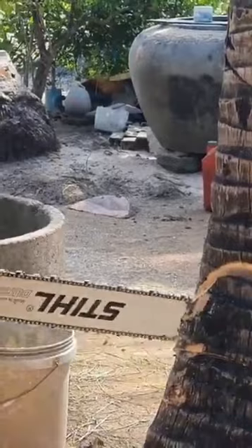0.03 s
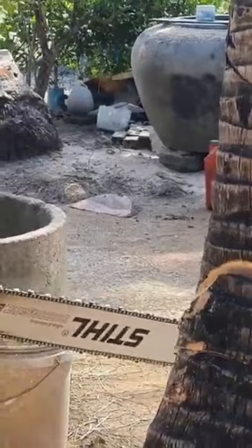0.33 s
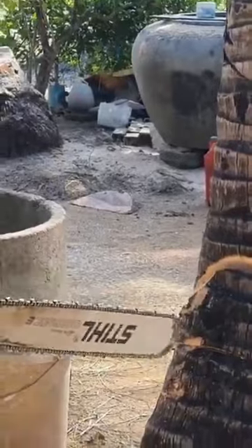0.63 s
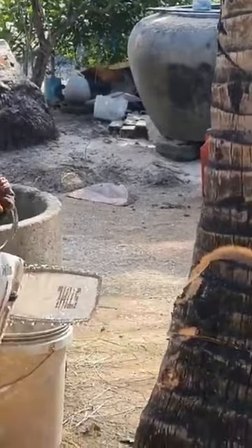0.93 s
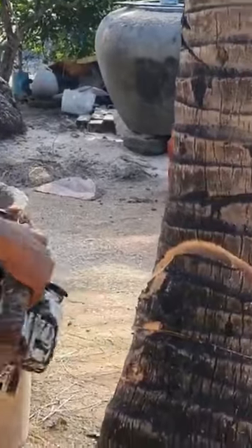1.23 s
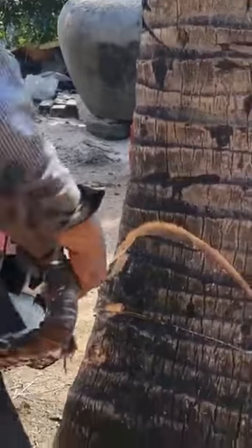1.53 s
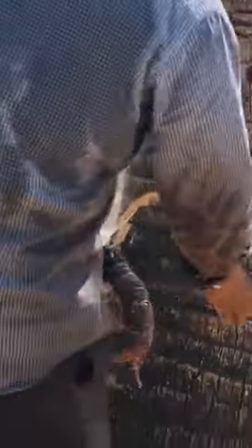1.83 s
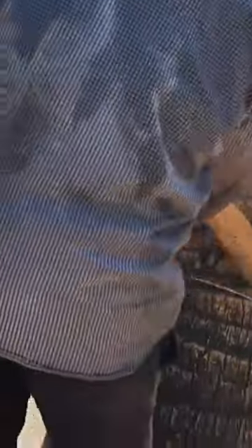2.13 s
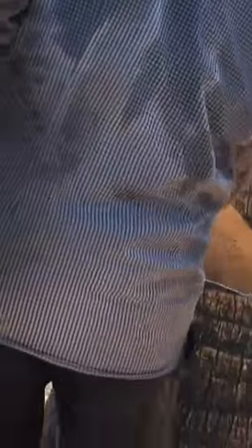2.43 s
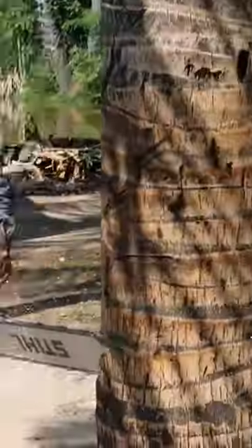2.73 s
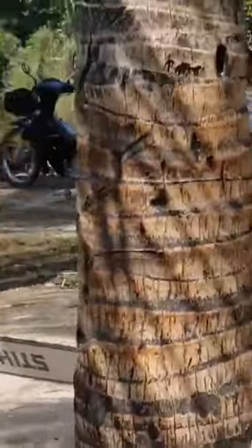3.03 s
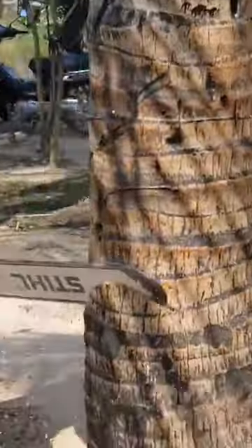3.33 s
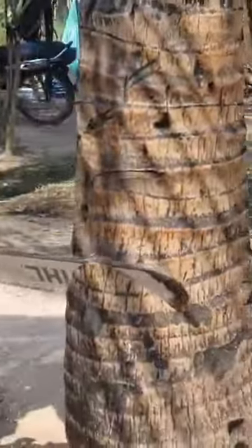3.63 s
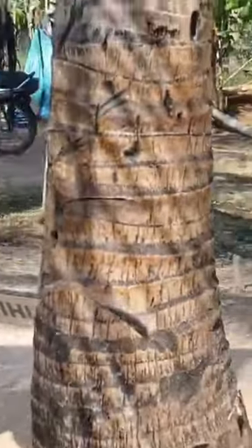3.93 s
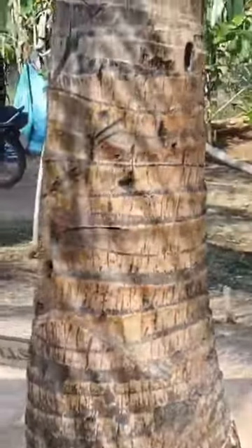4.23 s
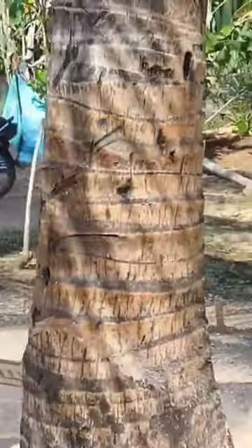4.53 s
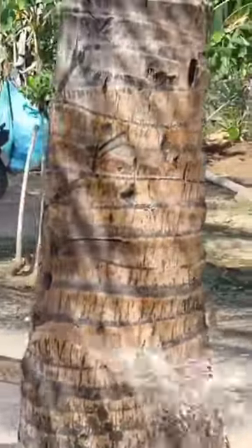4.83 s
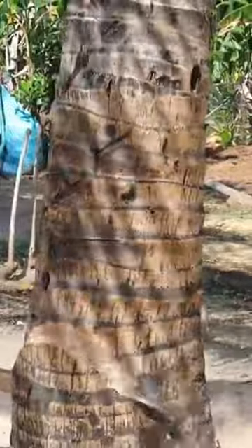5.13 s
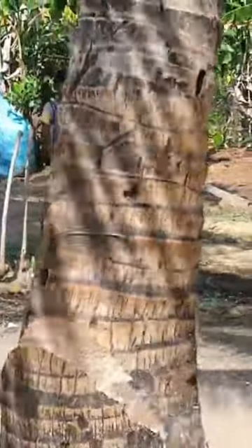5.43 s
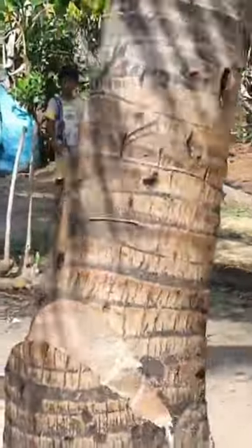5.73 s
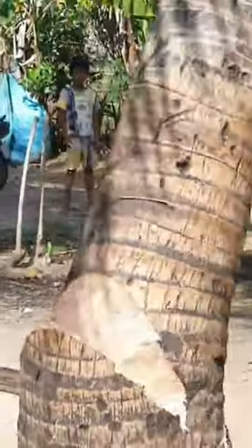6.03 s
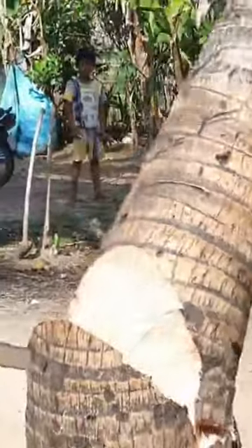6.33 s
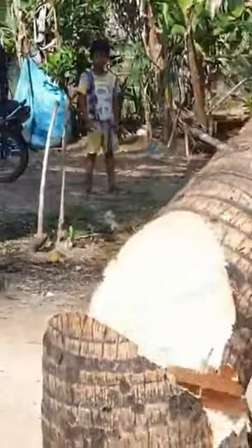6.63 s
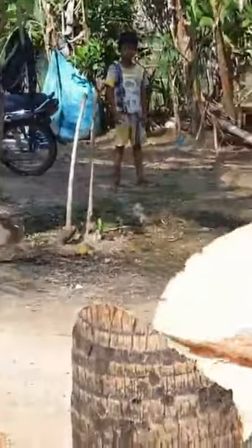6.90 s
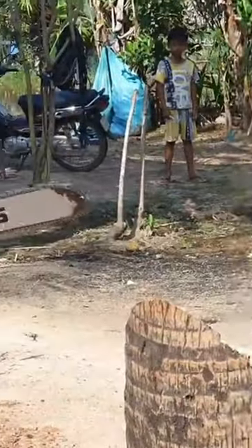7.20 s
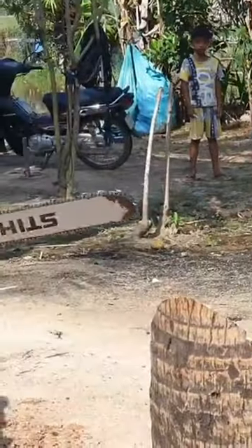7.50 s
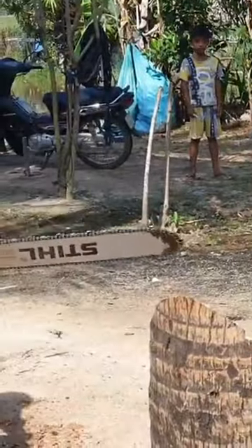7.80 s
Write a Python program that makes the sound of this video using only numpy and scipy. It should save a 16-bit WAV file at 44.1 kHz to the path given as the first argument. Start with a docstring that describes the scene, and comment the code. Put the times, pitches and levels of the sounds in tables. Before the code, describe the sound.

A two-stroke chainsaw idles unevenly in an open yard, close by and louder on the right. For the first three seconds it putters and stumbles, with sharp, hollow pops from the muffler and a rattling loose chain. At about 3.1 seconds the sound jumps abruptly to the saw at full throttle in a palm trunk: a loud, steady snarl with metallic ringing and the bright, gritty tearing of fibres. The pitch sags around 5 seconds as the engine bogs. At 5.5 seconds the throttle is released, then the saw revs once more from about 5.7 to 6 seconds and runs down to a popping idle. At about 7.1 seconds the palm's crown hits the ground with a crunch, followed at once by a short swish of leaves. The saw keeps idling until the end at about 8 seconds, with a weak outdoor echo.

```python
"""A two-stroke chainsaw idles unevenly in an open yard, close by and louder on the right: the ports
putter, single firings bark and pop in the muffler, the loose chain rattles. At 3.1 s the sound cuts
abruptly to the saw already at full throttle in a palm trunk: every turn fires, snarling and ringing
the bar, while the teeth tear fibres. It bogs, is released at 5.5 s, revs once more and runs down to
idle. At 7.1 s the palm's crown crunches to the ground and its leaf tips swish after it."""
import sys
import numpy as np
from scipy import signal
from scipy.fft import rfft, irfft
from scipy.io import wavfile
from scipy.ndimage import uniform_filter1d, map_coordinates

SR = 44100
rng = np.random.default_rng(int(sys.argv[2]) if len(sys.argv) > 2 else 0)


def to_wav(s):
    """Save 16-bit WAV."""
    ch = np.atleast_2d(s).T  # columns
    pcm = np.round(np.clip(ch, -1, 1) * 32767)  # PCM
    wavfile.write(sys.argv[1], SR, pcm.astype(np.int16))


N = 355446
T = np.arange(N) / SR

# outdoor rumble bed: (frequency [Hz], level [dB])
YARD_EQ = [(20, 1), (70, 4), (200, 6), (600, 10), (3000, -35), (16000, -40)]
# even runs of idle firings, with stumbles between: (first [s], last [s], firings [count], level [dB])
IDLE_RUNS = [(.088, .272, 4, -10), (.328, .503, 4, -8.5), (.625, .746, 3, -7.5), (.862, 1.104, 5, -8.5),
             (1.193, 1.25, 2, -12), (1.317, 1.721, 8, -8), (1.806, 1.865, 2, -9.5), (1.951, 1.951, 1, -8),
             (2.007, 2.231, 5, -2.5), (2.287, 2.287, 1, -9), (2.316, 2.542, 5, -5), (2.598, 2.598, 1, -2),
             (2.655, 2.8245, 4, -5), (2.881, 2.9395, 3, -7.5), (2.998, 3.1155, 3, -4.5),
             (6.703, 6.744, 2, -11), (6.829, 6.874, 2, -11), (6.994, 7.045, 2, -11), (7.2, 7.279, 2, -9.5),
             (7.333, 7.386, 2, -14), (7.438, 7.4905, 2, -9.5), (7.569, 7.888, 7, -10),
             (7.943, 7.999, 2, -16)]
# full-throttle stretches, the first starting at a hard cut, the second at a trigger pull:
# (start [s], release [s], closing time [s])
FULL_THROTTLE = [(3.143, 5.511, 0.095), (5.681, 6.021, 0.301)]
# crank speed from the hard cut to the top of the last rev: (time [s], speed [turns/s])
REV_CURVE = [(3.16, 115.5), (3.22, 117.3), (3.27, 116.7), (3.33, 114.7), (3.42, 120.7), (3.47, 123.1),
             (3.57, 119.9), (3.66, 118.8), (3.78, 121.7), (4.29, 117.2), (4.55, 111.6), (4.78, 115.3),
             (4.86, 114.0), (4.96, 97.9), (5.15, 106.6), (5.24, 107.5), (5.5, 103.7), (5.53, 99.6),
             (5.59, 89.0), (5.68, 72.4), (5.72, 72.1), (6.0, 100.2), (6.09, 104.4)]
# how hard the teeth bite: (time [s], bite [0-1])
BITE = [(3.14, 0), (3.15, 1), (5.45, 1), (5.56, 0)]
# how squarely the muffler faces the listener: (time [s], level [dB])
FACING = [(0, 3), (1.3, 3.5), (2.03, 5), (2.35, 4), (3.0, 3), (3.3, 1.5), (3.75, 5), (4.1, 5), (4.5, 0.5),
          (5.0, -2), (5.4, -1), (5.7, -3.5), (6.05, -0.5), (6.4, -2), (6.85, -4), (7.35, 4), (8.05, -1)]
# swells as the saw is swung: (peak [s], half-width [s], throb [dB], honk [dB], upper note [dB])
SWING_SWELLS = [(.98, 0.052, -57.5, -34.5, -39), (1.65, 1, -43.5, -41, -63), (2.02, 0.047, -49, -46, -41),
                (2.16, 0.059, -53, -29.5, -40.5), (7.3, 0.14, -47, -39, -29), (7.8, 0.28, -62, -73, -39.5)]
# low exhaust throb: (frequency [Hz], level [dB])
THROB_EQ = [(30, -42), (70, -8), (105, -2), (160, -1), (200, -5.5), (245, -0.5), (290, -1), (380, 6),
            (900, -62)]
# hollow honk of the ports: (frequency [Hz], width [Hz], level [dB])
HONK_MODES = [(374, 165, 19), (462, 810, -12), (647, 40, 14.5)]
# the muffler's broad putter while the chain runs free: (frequency [Hz], level [dB])
MUFFLER_FREE_EQ = [(250, -43), (450, -12.5), (570, 3), (700, 7.5), (850, -1), (1000, -6), (1200, -8),
                   (1400, -12), (2200, -18)]
# the muffler's peakier note in the trunk: (frequency [Hz], level [dB])
MUFFLER_LOADED_EQ = [(250, -50), (480, -2.5), (590, 10), (660, 3.5), (730, 11.5), (790, 9.5), (870, -5),
                     (970, -18), (1090, -0.5), (1250, -43), (2200, -15.5)]
# upper hollow note heard on the swings: (frequency [Hz], width [Hz], level [dB])
UPPER_NOTE_MODE = [(653.4, 57, 0)]
# bark as the saw is turned: (time [s], rise [s], decay [s], gas [dB], clank [dB], fizz [dB])
BARK_SHAPE = [(0, 0.0047, 0.0083, -7.5, -15, -4), (1.85, 0.0024, 0.0083, -9, -7, 0.5),
              (2.1, 0.0024, 0.0018, -7, -12, -1), (2.6, 0.0028, 0.0014, -6.5, -26, 3),
              (3.1, 0.0023, 0.0018, -8.5, -36, 4.5), (6.7, 0.00055, 0.00068, -8.5, -14, 6),
              (7.5, 0.00042, 0.0009, -8.5, -3, 2), (8, 0.00079, 0.0013, -8.5, -8, 2)]
# muffler shell clank on a single firing: (frequency [Hz], level [dB])
CLANK_MODES = [(2310, -1.5), (2560, -6), (4980, -11)]
# the bark's spit of gas: (frequency [Hz], level [dB])
BARK_EQ = [(500, -38.5), (950, 13.5), (1250, -10), (1550, -8), (2050, -1), (2500, 6), (3100, -2.5),
           (3700, 2), (4700, 1), (5750, 5), (6300, -4), (6900, 3), (7600, -6.5), (8600, -18), (12500, -4),
           (15000, -13.5), (16000, -21.5)]
# muffler cavity: (frequency [Hz], width [Hz], level [dB])
CAVITY_MODES = [(782, 450, 0), (1030, 260, -0.5)]
# rattle of loose chain and clutch: (time [s], level [dB])
RATTLE_LEVEL = [(0, -25.5), (1.5, -24.5), (2.1, -24.5), (2.5, -26.5), (3.1, -28.5), (6.0, -24.5),
                (6.6, -29.5), (7.45, -27.5), (8.05, -30)]
# clattering links: (frequency [Hz], level [dB])
RATTLE_EQ = [(40, -60), (400, 10.5), (700, 9.5), (950, -1), (1400, -6.5), (2000, -0.5), (2450, 2),
             (3100, 1.5), (4300, -4), (5800, -5.5), (7000, -7), (8600, -24), (12000, -13.5), (15000, -14),
             (16000, -19)]
# hiss of the running chain and the gas jet: (frequency [Hz], level [dB])
RASP_EQ = [(30, -10), (350, 5), (500, -29), (1000, -13.5), (1600, -19), (2300, 3.5), (3100, 2),
           (3800, -3.5), (4450, -2), (5000, 0.5), (5700, -6.5), (6400, -3.5), (7200, -10), (8600, -18.5),
           (12500, -8), (15000, -8), (16000, -43.5)]
# muffler shell under throttle: (frequency [Hz], width [Hz], level [dB])
SHELL_MODES = [(1860, 170, -2), (2337, 85, 4), (2520, 150, -2), (2630, 180, 2.5), (3012, 120, 4.5)]
# bar resonances singing out: (peak [s], half-width [s], frequency [Hz], width [Hz], level [dB])
BAR_RINGS = [(3.35, 0.16, 1057, 109, -31), (3.35, 0.11, 1810, 303, -28), (3.4, 0.25, 3080, 256, -29),
             (3.55, 0.45, 6150, 330, -27), (3.8, 0.11, 1094, 110, -29), (3.9, 0.26, 2290, 70, -22),
             (4.1, 0.36, 6220, 172, -29), (4.68, 0.18, 3064, 170, -21.5), (4.7, 0.33, 2620, 129, -26),
             (4.55, 0.96, 1480, 220, -41), (4.7, 0.25, 6360, 150, -31), (4.95, 0.12, 1990, 198, -22.5),
             (5.1, 1, 4910, 199, -28), (5.28, 0.2, 2426, 218, -22), (5.97, 0.16, 2546, 302, -20.5),
             (6.02, 0.16, 3040, 300, -24.5)]
# full-throttle snarl: (frequency [Hz], level [dB])
SNARL_EQ = [(100, -50), (400, -20), (950, -12), (1150, -14), (1400, -6), (1650, -6), (1900, -2.5),
            (2270, 0.5), (2550, 3), (2800, 2), (3060, 2), (3350, -3), (3700, -8), (4400, -9), (5000, -3),
            (5800, -6), (6400, -2), (7500, -12), (9000, -20), (16000, -24)]
# sharp edge of each firing: (frequency [Hz], level [dB])
CRACK_EQ = [(500, -50), (3500, -14), (5000, 7), (5800, 0), (6600, 16), (7600, -9), (8800, -10), (11500, 9),
            (13000, 4), (15500, -20)]
# tearing fibres: (frequency [Hz], level [dB])
TEAR_EQ = [(200, -19), (1200, -17), (2500, -11), (3600, -7.5), (4400, -13), (5400, 23), (7000, 2),
           (8800, -42), (12000, 18.5), (15500, -10)]
# fronds hitting the dirt: (frequency [Hz], level [dB])
FROND_EQ = [(60, -41), (300, -5.5), (800, -14), (1200, -13), (2200, -7.5), (3200, -2), (4200, 0),
            (6000, 5.5), (8500, -4.5), (15000, -10)]
# shading of the saw's left channel: (frequency [Hz], level [dB])
LEFT_SHADE_EQ = [(60, -10.5), (700, -10.8), (1300, -9.5), (2400, -6.5), (4400, -4), (8000, -5),
                 (14000, -2.5)]
# how alike the two channels are: (frequency [Hz], likeness [0-1])
STEREO_LIKENESS = [(60, .97), (600, .96), (1200, .74), (3000, .6), (8000, .5), (15000, .5)]
# treble drift as the saw moves: (time [s], left level [dB])
TREBLE_PAN = [(0, -2.5), (1.9, -1.5), (2.15, 0.5), (2.8, 2.5), (3.2, 0.5), (5.9, -1), (6.9, -1), (8, -2.5)]

IDLE_HZ, SETTLED_HZ, FULL_HZ = 35.5, 62, 120  # crank speeds: idle, end of stumbling, flat out
OPEN_S, JITTER_S = .008, .00001  # throttle attack; timing scatter of the firings
ROUGHNESS = .12  # share of noise driving the bar and shell


def amp(db):
    """Decibels to gain."""
    return 10 ** (np.asarray(db) / 20)


def along(rows, column=1):
    """One column of a table as an automation curve."""
    rows = np.array(sorted(map(tuple, rows)))
    return np.interp(T, rows[:, 0], rows[:, column])


def spectrum(points, hz):
    """Joins points on a log-frequency axis."""
    knots_hz, values = np.transpose(points)
    return np.interp(np.log(hz + 1), np.log(knots_hz + 1), values)


def steady(x, size=4800):
    """Rides the slow level to rms 1, leaving transients their shape."""
    power = uniform_filter1d(uniform_filter1d(x ** 2, size), size)
    return x / np.sqrt(abs(power) + 1e-4 * np.mean(x ** 2))


def eq(x, points, size=4096):
    """Minimum-phase equaliser."""
    curve_db = spectrum(points, abs(np.fft.fftfreq(size, 1 / SR)))
    log_gain = np.log(amp(np.maximum(curve_db, -100)))
    taps = np.fft.ifft(np.exp(np.conj(signal.hilbert(log_gain)))).real
    return signal.oaconvolve(x, taps[:size // 2])[:N]


def highpass(x, hz, order=4):
    """Rolls off the lows."""
    return signal.sosfilt(signal.butter(order, hz, "high", fs=SR, output="sos"), x)


def ring(x, modes):
    """Parallel resonators, each applied twice for steep skirts."""
    out = np.zeros(N)
    for hz, width, db in modes:
        b, a = signal.iirpeak(hz, hz / (0.65 * width), SR)
        out += amp(db) * signal.lfilter(b, a, signal.lfilter(b, a, x))
    return out


def clicks(times, sizes, half_taps=8):
    """Band-limited clicks at exact moments."""
    at = times[:, None] * SR
    index = np.round(at).astype(int) + np.arange(-half_taps, half_taps + 1)
    shape = np.sinc(index - at) * np.sinc((index - at) / (half_taps + 1))
    return np.bincount(np.clip(index, 0, N - 1).ravel(), (sizes[:, None] * shape).ravel(), N)


def fade(x, decay_s):
    """Turns every click into a falling envelope."""
    return signal.lfilter([1], [1, -np.exp(-1 / SR / decay_s)], x)


def grit(per_s, spread_db, length_s):
    """Random tiny impacts, each a puff of noise, a few of them large."""
    sizes = amp(spread_db * np.minimum(rng.exponential(1, N), 4)) * (rng.random(N) < per_s / SR)
    return steady(np.sqrt(fade(sizes ** 2, length_s)) * rng.standard_normal(N))


def noise_tail(decay_s, size):
    """A dying burst of noise to convolve with."""
    return rng.standard_normal(size) * np.exp(-np.arange(size) / SR / decay_s)


def smear(x, decay_s, size=2048):
    """Spreads clicks over a few milliseconds without changing their tone."""
    spread = rfft(noise_tail(decay_s, size))
    taps = np.roll(irfft(spread / abs(spread)), size // 2)
    return signal.oaconvolve(x, taps, "same")


def bell(peak_s, half_s):
    """A smooth swell in and out."""
    return np.exp(-((T - peak_s) / half_s) ** 2)


def yard_air(level_db=-60):
    """A faint bed of outdoor rumble."""
    rumble = np.array([steady(eq(rng.standard_normal(N), YARD_EQ)) for _ in range(2)])
    return amp(level_db) * rumble * amp([[-6], [0]])


def single_firings(onset_db=-5.0, spread_db=.7):
    """Times and levels of the idle firings, plus one at the start of each full-throttle stretch."""
    idle = [(s, db) for first, last, count, db in IDLE_RUNS
            for s in np.linspace(first, last, round(count))]
    onsets = [(start + OPEN_S / 2, onset_db) for start, _, _ in FULL_THROTTLE]
    times, levels = np.array(sorted(idle + onsets)).T
    return times, levels + spread_db * rng.standard_normal(len(times))


def throttle_opening():
    """Each full-throttle stretch comes in at once, holds and slides shut on release."""
    return sum(np.clip((T - start) / OPEN_S, 0, 1) * np.clip(1 - (T - release) / close_s, 0, 1)
               for start, release, close_s in FULL_THROTTLE)


def crank_speed(coast_s=.39):
    """Idle, a hard cut to working speed, one more rev, then a free run-down to idle."""
    coast = np.exp(-np.maximum(T - REV_CURVE[-1][0], 0) / coast_s)
    return IDLE_HZ + (T >= FULL_THROTTLE[0][0]) * (along(REV_CURVE) - IDLE_HZ) * coast


def crank_angle(speed, fired_s):
    """The angle in turns, nudged so each single firing lands on a whole turn, and those turns."""
    turns = np.cumsum(speed) / SR
    at = np.interp(fired_s, T, turns)
    fired_turns = np.round(at[0]) + np.append(0, np.cumsum(np.round(np.diff(at))))
    return turns + np.interp(T, fired_s, fired_turns - at), fired_turns


def port_putter(turns, strokes, fired_turns, speed, throttle, bite, misfire_db=-4, intake_db=-6,
                intake_turn=0.324, uneven_db=-1.0, stumble_db=3.0, breath_db=-11, settled_db=-18.0):
    """Each turn puffs from the exhaust, then the intake; single firings puff harder."""
    def gain(idle_db, throttle_db, octave_db):
        """A voice grows with throttle and speed, and as it faces the listener."""
        revs_db = octave_db * np.log2(speed / IDLE_HZ)
        return amp(idle_db + throttle_db * throttle + revs_db + along(FACING))

    exhaust_s, intake_s = np.interp(strokes, turns, T), np.interp(strokes + intake_turn, turns, T)
    chance = rng.standard_normal((len(strokes), 2))
    settled = np.clip((speed - IDLE_HZ) / (SETTLED_HZ - IDLE_HZ), 0, 1)
    scatter_db = uneven_db + stumble_db * (1 - np.interp(exhaust_s, T, settled))
    stroke_db = np.where(np.isin(strokes, fired_turns), 0, misfire_db)
    exhaust = clicks(exhaust_s, amp(stroke_db + scatter_db * chance[:, 0]))
    intake = clicks(intake_s, amp(misfire_db + intake_db + 2 * uneven_db * chance[:, 1]))
    puffs = steady(exhaust + intake)
    breath = steady(fade(exhaust, decay_s=0.048) * rng.standard_normal(N))
    turbulence = amp(breath_db + settled_db * settled) * breath
    sputter = .6 * (1 - settled) * rng.standard_normal(N)  # ragged gas flow at idle
    exhaust_flow, flow = steady(exhaust) + turbulence, puffs + turbulence
    throb = steady(eq(exhaust_flow + sputter, THROB_EQ))
    honk = steady(ring(exhaust_flow + 0.13 * puffs, HONK_MODES))
    muffler = steady(bite * eq(flow, MUFFLER_LOADED_EQ) + (1 - bite) * eq(flow, MUFFLER_FREE_EQ))
    upper_note = steady(ring(flow, UPPER_NOTE_MODE))
    throb_swell, honk_swell, upper_swell = sum(amp(levels_db)[:, None] * bell(s, half_s)
                                               for s, half_s, *levels_db in SWING_SWELLS)
    return (np.hypot(gain(idle_db=-47.5, throttle_db=9, octave_db=0.66), throb_swell) * throb
            + np.hypot(gain(idle_db=-47, throttle_db=8, octave_db=1.9), honk_swell) * honk
            + gain(idle_db=-36.5, throttle_db=0.79, octave_db=4.5) * muffler
            + upper_swell * upper_note)


def barks(fired_s, fired_db, open_s=0.0011, hold_s=0.0041, tail_db=-20, tail_s=0.029,
          clank_s=0.0024, detune=0.03, fizz_hz=9000):
    """A single firing spits a short burst of gas and clanks the muffler shell."""
    envelope, clanks = np.zeros(N), np.zeros(N)
    rise_s, decay_s, gas_db, clank_db, fizz_db = (along(BARK_SHAPE, k) for k in range(1, 6))
    for s, db in zip(fired_s, fired_db):
        near = slice(max(int((s - .03) * SR), 0), int((s + .1) * SR))
        age = T[near] - s
        attack = amp(db) * np.exp(np.minimum(age - open_s, 0) / rise_s[int(s * SR)])
        late = np.maximum(age - hold_s, 0)
        release = np.exp(-late / decay_s[int(s * SR)]) + amp(tail_db) * np.exp(-late / tail_s)
        envelope[near] += attack * release
        for hz, mode_db in CLANK_MODES:
            cycles = hz * (1 + detune * rng.standard_normal()) * age + rng.random()
            clanks[near] += amp(mode_db) * attack * np.exp(-late / clank_s) * np.sin(2 * np.pi * cycles)
    spit = rng.standard_normal(N) + 1.5 * grit(per_s=2700, spread_db=2.15, length_s=0.00025)
    gas = highpass(eq(spit, BARK_EQ), 1500)
    fizz = irfft(rfft(gas) * (np.fft.rfftfreq(N, 1 / SR) > fizz_hz), N)
    fizzy_gas = (gas + (amp(fizz_db) - 1) * fizz) / gas.std()
    return amp(gas_db) * envelope * fizzy_gas + amp(clank_db) * clanks


def muffler_pops(fired_s, fired_db, peak_db=-16.0, follow=0.86, lag_s=0.0009):
    """Every single firing knocks the muffler's cavity with the same hollow pop."""
    knocks = ring(clicks(fired_s + lag_s, amp(follow * fired_db)), CAVITY_MODES)
    return amp(peak_db) * knocks / abs(knocks).max()


def chain(fired_s, turns, speed, bite, running_db=-24, octave_db=13, cutting_db=5.0,
          surge=0.049, surge_turn=0.037, jerk=0.052):
    """Loose links clatter, jerked by single firings; the hiss grows with speed and bite."""
    jerks = 1 + jerk * fade(clicks(fired_s + 0.0023, np.ones(len(fired_s))), decay_s=0.01)
    links = (rng.standard_normal(N) + 1.11 * grit(per_s=1800, spread_db=3.3, length_s=0.000072)) * jerks
    links = highpass(links, 1150, order=2) + .1 * links
    rattle = amp(along(RATTLE_LEVEL)) * steady(eq(links, RATTLE_EQ))
    tug = 1 + surge * np.cos(2 * np.pi * (turns - surge_turn))  # each power stroke pulls the teeth
    running = amp(running_db + octave_db * np.log2(speed / FULL_HZ) + cutting_db * bite)
    return rattle + running * tug * steady(eq(links, RASP_EQ))


def firing_blows(stroke_s, uneven_db):
    """One click a turn, very slightly off the beat."""
    chance = rng.standard_normal((len(stroke_s), 2))
    return clicks(stroke_s + JITTER_S * chance[:, 0], amp(uneven_db * chance[:, 1]))


def exhaust_rasp(stroke_s, speed, throttle, bite, gas_db=-20, gas_octave_db=8, buried_db=-3,
                 shell_db=-24, shell_octave_db=18, muffled_db=-1):
    """Under throttle every turn fires: a jet of gas, and a blow that rings the muffler shell."""
    blows = firing_blows(stroke_s, uneven_db=0)
    jet = steady(fade(fade(blows, 0.0009), 0.014)) * rng.standard_normal(N)
    gas = highpass(steady(eq(jet + 0.19 * steady(blows), RASP_EQ)), 950)
    shell = steady(ring(steady(blows) + ROUGHNESS * jet, SHELL_MODES))
    octaves = np.log2(speed / FULL_HZ)
    return throttle * (amp(gas_db + gas_octave_db * octaves + buried_db * bite) * gas
                       + amp(shell_db + shell_octave_db * octaves + muffled_db * bite) * shell)


def bar_ring(stroke_s, throttle, uneven_db=4.5):
    """Firings shake the bar; its resonances come and go as the trunk grips it in changing places."""
    blows = steady(clicks(stroke_s, amp(uneven_db * rng.standard_normal(len(stroke_s)))))
    drive = blows + ROUGHNESS * rng.standard_normal(N)
    return throttle * sum(amp(db) * bell(s, half_s) * steady(ring(drive, [(hz, width, 0)]))
                          for s, half_s, hz, width, db in BAR_RINGS)


def snarl(stroke_s, speed, throttle, level_db=-16.3, octave_db=7, smear_s=0.0028,
          sway_hz=(1.2, 6), waver=.4):
    """The blows fuse into a snarl; paths off bar and trunk trade places, so each overtone wavers."""
    blows = firing_blows(stroke_s, uneven_db=2.0)
    voice = smear(blows, smear_s)
    for hz in np.geomspace(*sway_hz, 4):
        voice += waver * np.sin(2 * np.pi * (hz * T + rng.random())) * smear(blows, smear_s)
    return throttle * amp(level_db + octave_db * np.log2(speed / FULL_HZ)) * steady(eq(voice, SNARL_EQ))


def cracks(stroke_s, speed, throttle, bite, level_db=-25.5, octave_db=-4.5, buried_db=-5.5,
           uneven_db=7.5):
    """Each firing under throttle opens with a bright crack, hardest as the engine labours at low revs."""
    sizes = amp(uneven_db * np.clip(rng.standard_normal(len(stroke_s)), -2, 2))
    bursts = fade(clicks(stroke_s, sizes), decay_s=.0014) * rng.standard_normal(N)
    gain = amp(level_db + octave_db * np.log2(speed / FULL_HZ) + buried_db * bite)
    return throttle ** 2 * gain * steady(eq(bursts, CRACK_EQ))


def tearing(bite, level_db=-26):
    """The teeth snap palm fibres and fling chips: a dense, bright grit."""
    fibres = grit(per_s=1400, spread_db=4.2, length_s=0.0003)
    return bite * amp(level_db) * steady(eq(fibres, TEAR_EQ))


def palm_crash(land_s=7.1, crunch_db=-4.0, swish_db=-22, swish_lag_s=.06, low_hz=900, split_hz=2800):
    """The crown's stems crunch on the dirt; the leaf tips swish down just after and settle."""
    def hit(peak_s, rise_s, settle_s):
        return np.exp(np.minimum((T - peak_s) / rise_s, (peak_s - T) / settle_s))

    rustles = (rng.standard_normal(N) + 1.8 * grit(per_s=630, spread_db=3.1, length_s=0.0034)
               for _ in range(2))
    fronds = np.array([steady(eq(rustle, FROND_EQ)) for rustle in rustles])
    stems = signal.sosfilt(signal.butter(2, [low_hz, split_hz], "band", fs=SR, output="sos"), fronds)
    tips = highpass(fronds, split_hz)
    crunch = amp(crunch_db) * hit(land_s, rise_s=.04, settle_s=0.14) * stems
    swish = amp(swish_db) * hit(land_s + swish_lag_s, rise_s=.06, settle_s=0.14) * tips
    return (crunch + swish) * amp([[-4], [2]])


def near_bounces(x, throttle, bounce=0.57, drift_s=0.0003537, grip=.97, count=4):
    """Bounces off bar, trunk and ground flange as the saw moves; under throttle it is braced."""
    out = x.copy()
    travel_s = np.cumsum(1 - grip * throttle) / SR
    for delay_s in np.geomspace(.0007, .004, count):
        wander = signal.resample(rng.standard_normal(24), 800)
        drift = np.interp(travel_s, np.linspace(0, T[-1], len(wander)), wander)
        path_s = abs(delay_s + drift_s * drift)
        out += bounce * map_coordinates(x, [(T - path_s) * SR], order=2)
    return out / np.sqrt(1 + count * bounce ** 2)


def yard_echo(x, decay_s=.12):
    """The yard returns a weak, dense cloud of reflections on each side."""
    tails = [noise_tail(decay_s, size=9000) for _ in range(2)]
    echoes = np.array([signal.oaconvolve(x, tail / np.linalg.norm(tail))[:N] for tail in tails])
    return echoes * amp([[-27], [-21]])


def stereo_image(right, reflected, lead_s=.0001, lead_rad=0.95, usual_pan_db=0.5):
    """The left side is shaded, a little early, and carries more of the sound off nearby things."""
    hz = np.fft.rfftfreq(N, 1 / SR)
    likeness = np.clip(spectrum(STEREO_LIKENESS, hz), 0, 1)
    direct = rfft(right) * np.exp(1j * (lead_rad + 2 * np.pi * hz * lead_s))
    blend = likeness * direct + np.sqrt(1 - likeness ** 2) * rfft(reflected)
    shaded = blend * amp(spectrum(LEFT_SHADE_EQ, hz))
    treble = irfft(shaded * np.clip(hz / 1500 - 1, 0, 1), N)
    left = irfft(shaded, N) + treble * (amp(along(TREBLE_PAN) - usual_pan_db) - 1)
    return np.array([left, right])


def scene():
    """One crank drives all the saw's layers; echo, falling palm and air sit around it."""
    fired_s, fired_db = single_firings()
    speed, throttle, bite = crank_speed(), throttle_opening(), along(BITE)
    turns, fired_turns = crank_angle(speed, fired_s)
    strokes = np.arange(1, np.floor(turns[-1]))
    stroke_s = np.interp(strokes, turns, T)

    def bright_layers():
        """The saw's top end: the same timing with fresh noise on each call."""
        clatter = (barks(fired_s, fired_db) + exhaust_rasp(stroke_s, speed, throttle, bite)
                   + chain(fired_s, turns, speed, bite))
        return (near_bounces(clatter, throttle) + bar_ring(stroke_s, throttle)
                + snarl(stroke_s, speed, throttle) + cracks(stroke_s, speed, throttle, bite)
                + tearing(bite))

    direct, reflected = bright_layers(), bright_layers()
    body = port_putter(turns, strokes, fired_turns, speed, throttle, bite)
    saw = body + muffler_pops(fired_s, fired_db) + direct
    return stereo_image(saw, reflected) + yard_echo(saw) + palm_crash() + yard_air()


def record(dry, start_s=.082, ceiling=.85, lowpass_hz=15900):
    """Master chain: a hard cut in from silence, clipped peaks and a steep low-pass."""
    clipped = np.clip(dry * (T >= start_s), -ceiling, ceiling)
    lowpass = signal.firwin(401, lowpass_hz, window=("kaiser", 9), fs=SR)
    return signal.oaconvolve(clipped, lowpass[None], "same")


dry = scene()
out = record(dry)
to_wav(out)
```